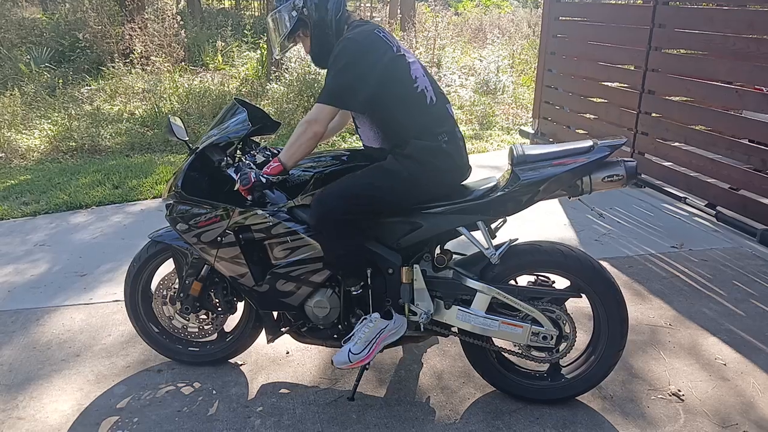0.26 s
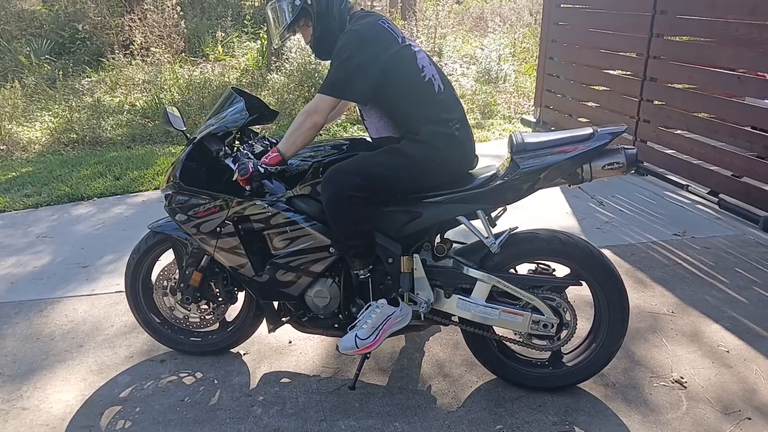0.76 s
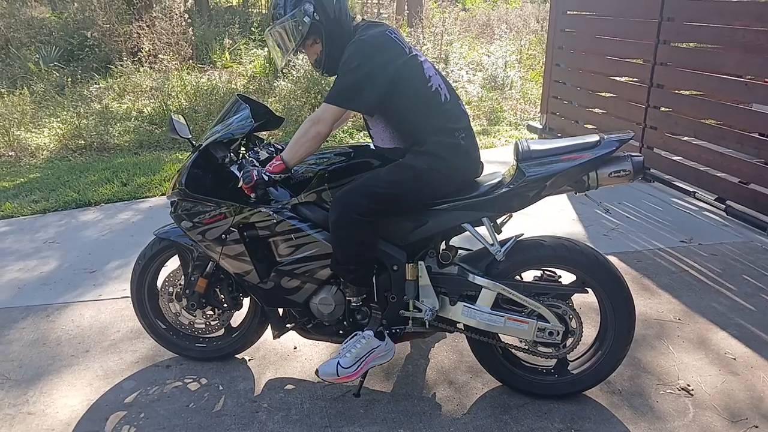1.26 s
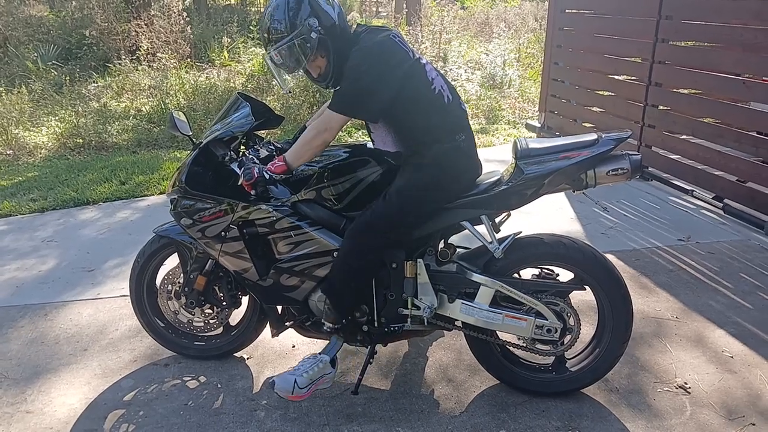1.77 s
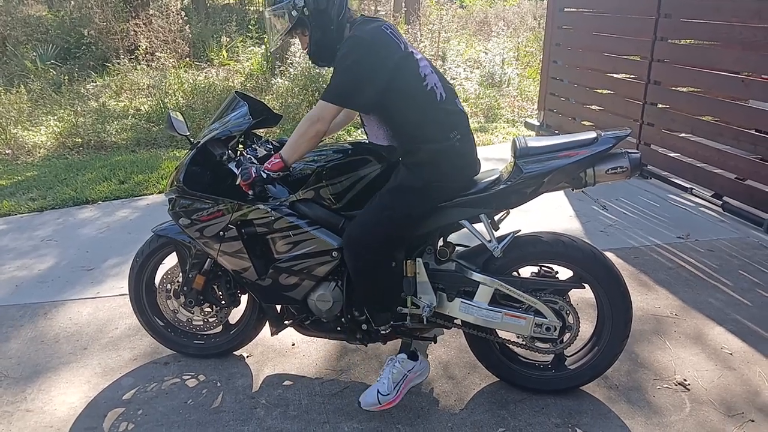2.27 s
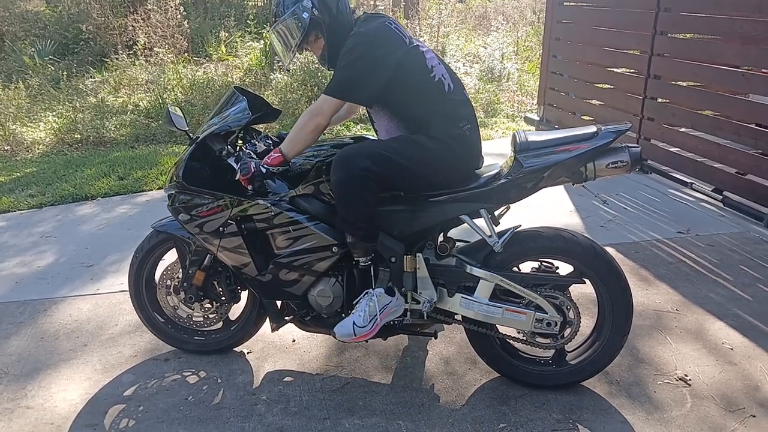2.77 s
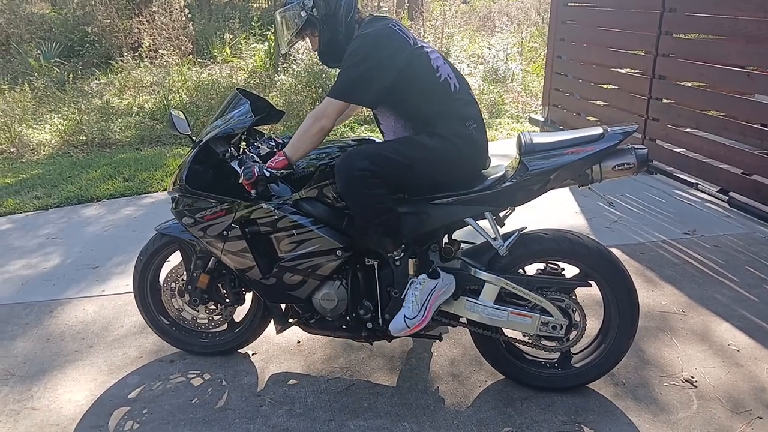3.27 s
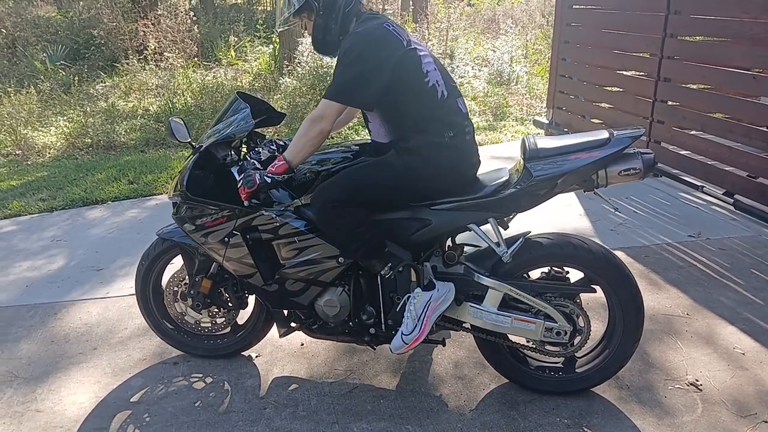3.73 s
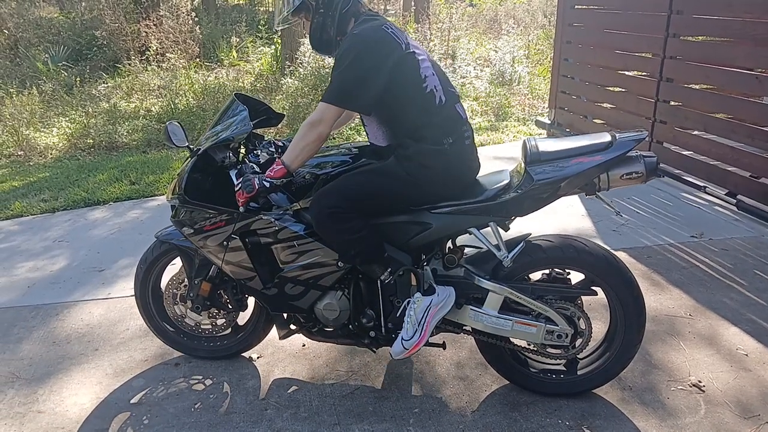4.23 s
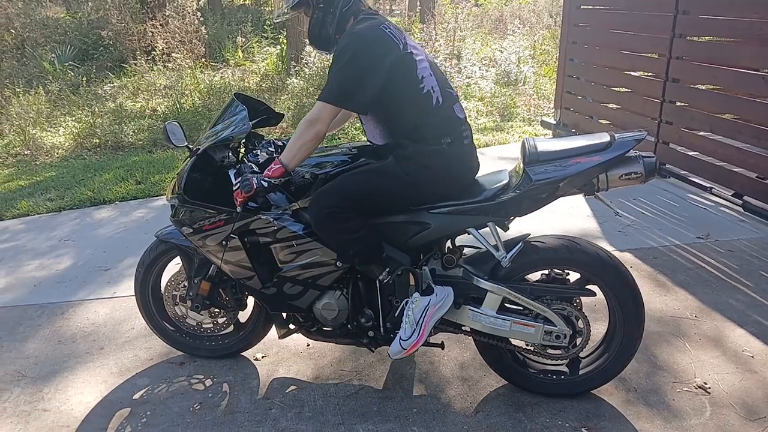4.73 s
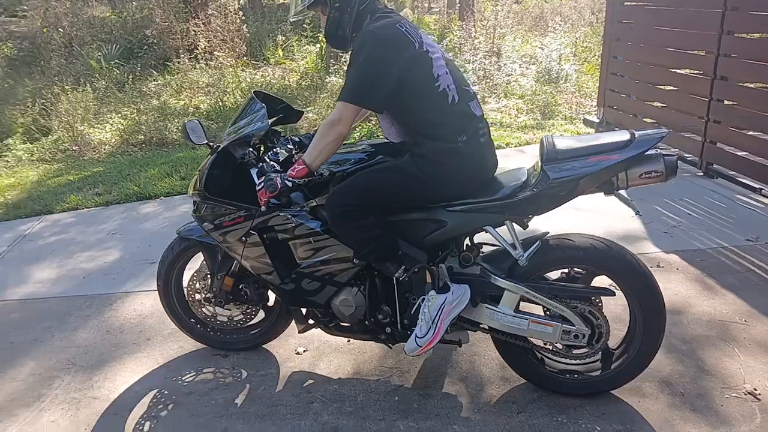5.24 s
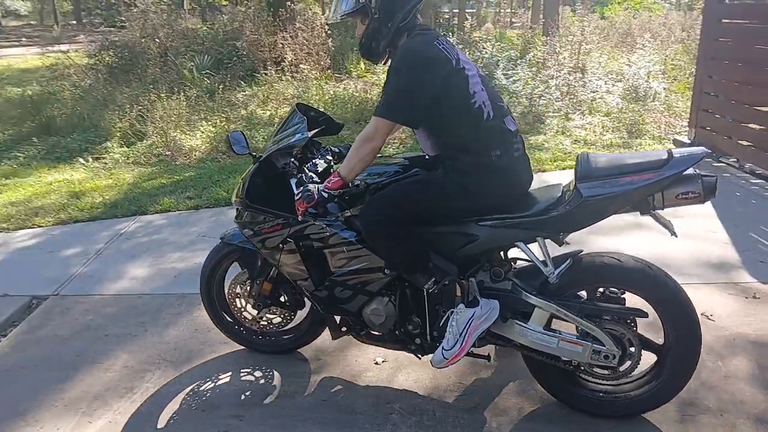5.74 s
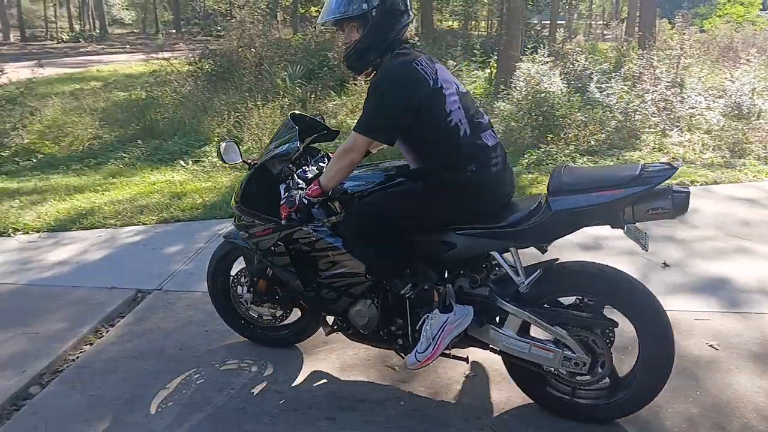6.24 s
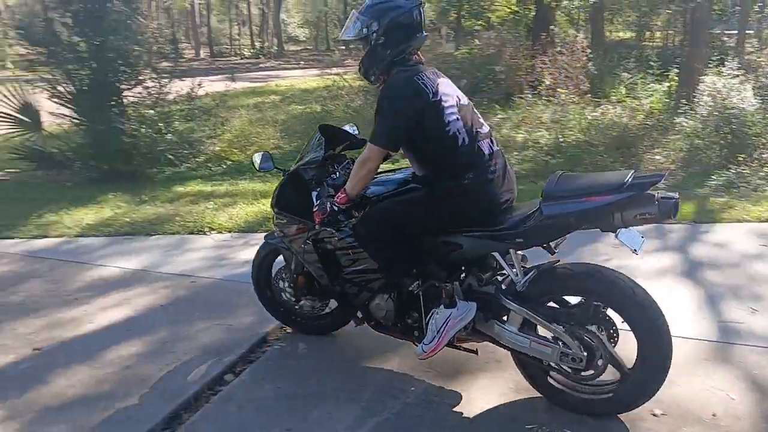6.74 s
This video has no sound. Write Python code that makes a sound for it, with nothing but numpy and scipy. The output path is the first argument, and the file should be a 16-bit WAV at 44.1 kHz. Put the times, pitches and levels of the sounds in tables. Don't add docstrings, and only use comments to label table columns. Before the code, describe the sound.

A four-cylinder motorcycle stalls with metal clacks and fading puffs, leaving faint traffic hum. The side stand snaps up with sharp clacks, a starter whines in four short surges, and the engine catches unevenly with rattle. It settles to a buzzing low idle, gets one quick blip with popping overrun, then revs moderately and pulls away. Phone a few metres off on an open concrete drive.

```python
import sys
import numpy as np
from scipy import signal
from scipy.fft import rfft, irfft, next_fast_len
from scipy.io import wavfile
from scipy.ndimage import map_coordinates

SR = 44100
rng = np.random.default_rng(int(sys.argv[2]) if len(sys.argv) > 2 else 0)


def pcm_store(signal):
    levels = np.round(np.clip(np.atleast_2d(signal), -1, 1) * 32767)
    wavfile.write(sys.argv[1], SR, levels.astype(np.int16).T)


def gain_from_db(level_db):
    decades = np.asarray(level_db, float) / 20
    return 10 ** decades


N = 308700
STAND_S, CRANK_S = 2.025, 2.19


def unit(x):
    return x / np.sqrt(np.mean(x ** 2) + 1e-20)


def along(points, hz):
    f, v = np.transpose(points)
    return np.interp(np.log(hz + 1), np.log(f + 1), v)


def curves(rows):
    s, *cols = np.transpose(rows)
    return [np.interp(np.arange(N) / SR, s, c) for c in cols]


def sounding(rows, fade):
    t = np.arange(N) / SR
    return np.clip(np.minimum(t - rows[0][0], rows[-1][0] - t) / fade + 1, 0, 1)


def wobble(rate):
    knots = rng.standard_normal(int(N * rate / SR) + 4)
    return map_coordinates(knots, [np.arange(N) * rate / SR])


def filtered(x, response):
    m = 2 * next_fast_len(N // 2 + SR // 4)
    return irfft(rfft(x, m) * response(np.fft.rfftfreq(m, 1 / SR)), m)[..., :N]


def causal(gain):
    c = irfft(np.log(gain + 1e-5))
    c[1:len(c) // 2] *= 2
    c[len(c) // 2 + 1:] = 0
    return np.exp(rfft(c))


def noise(spectrum, gate=1):
    return unit(filtered(gate * rng.standard_normal((2, N)), lambda hz: gain_from_db(along(spectrum, hz))))


def resonances(modes):
    return lambda f: sum(gain_from_db(db) * 1j * f * w / (c * c - f * f + 1j * f * w) for c, w, db in modes)


def driven(law, throttle_db):
    return law[0] + law[1] * throttle_db


# (time [s], firing rate [1/s])
FIRING_RATE = [(3.2, 45.2), (3.71, 45), (3.83, 51.2), (3.95, 48.7), (4.06, 52), (4.15, 80), (4.25, 109),
               (4.36, 99.7), (4.65, 64), (4.71, 49.5), (4.89, 44.5), (5.03, 45), (5.23, 59), (5.52, 59),
               (5.8, 56.8), (5.94, 54.3), (6.08, 57.1), (7.0, 57.2)]


def firings(throttle_db, since_clutch):
    rate = curves(FIRING_RATE)[0] * (1 + .008 * wobble(8))
    rate = rate * (1 + .02 * np.clip(-throttle_db / 3, 0, 1) * wobble(22))
    period_s, depth, dies_s = .25, .022, .7
    hunting = np.exp(-np.abs(since_clutch) / dies_s) * np.cos(2 * np.pi * since_clutch / period_s)
    rate = rate * (1 + depth * (since_clutch > -period_s / 4) * hunting)
    fires = np.arange(N) > FIRING_RATE[0][0] * SR
    return rate, np.flatnonzero(np.diff(np.floor(np.cumsum(rate * fires) / SR)))


# (time [s], extra bark [dB])
AFTERFIRES = [
    (2.79, 5),
    (3.84, 3),
    (4.32, 5),
    (4.4, 7),
    (4.5, 3),
    (4.62, 6.5),
    (4.75, 7),
    (4.83, 6),
    (4.94, 5),
]


def afterfire():
    half_length_s = .022
    t = np.arange(N) / SR
    return sum(np.exp(-((t - s) / half_length_s) ** 2) * db for s, db in AFTERFIRES)


# (time [s], throttle over idle [dB])
THROTTLE = [(2.57, -8.5), (2.731, 4), (2.85, 1), (3.2, -1), (3.8, -0.5), (3.89, -2), (4.049, -0.5),
            (4.13, 8), (4.2, 7.5), (4.279, -1.5), (4.45, -4), (4.6, -4.5), (4.7, -6.5), (4.9, -6),
            (5.1, -3), (5.32, -2), (5.6, 0.5), (7.0, 0.5)]
# (time [s], peak level [dB])
STALL_PUFFS = [(0.0, -8.5), (0.018, -10.5), (0.04, -13.5), (0.058, -8.5), (0.079, -8.5), (0.107, -13.5),
               (0.126, -16), (0.152, -15), (0.188, -18.5), (0.23, -20.5), (0.308, -36)]
# (time [s], peak level [dB])
CATCH_PUFFS = [(2.551, -10.5), (2.581, -5.5), (2.612, -14), (2.643, -20), (2.674, -12.5), (2.7, -8),
               (2.723, -8), (2.741, -9.5), (2.757, -5), (2.779, -8), (2.796, -15), (2.812, -7.5),
               (2.827, -12.5), (2.85, -17), (2.868, -8), (2.887, -17), (2.906, -7.5), (2.927, -10),
               (2.965, -10), (3.002, -20), (3.025, -9), (3.047, -16), (3.073, -7.5), (3.092, -8),
               (3.116, -27.5), (3.133, -7), (3.156, -24), (3.178, -12), (3.199, -8)]


def puff_trains():
    boom, second, bark = (34.8, .8), (37.5, 1), (35.14, 1.08)
    rasp, branch = (-4, 2.5), (-29, .9)
    uneven_db = 1.15
    throttle_db, = curves(THROTTLE)
    since_clutch = np.arange(N) / SR - 5.28
    rate, at = firings(throttle_db, since_clutch)
    rolling = since_clutch[at] > -.125
    luck = rng.standard_normal((len(at), 3))
    scatter_db = np.clip(uneven_db - .18 * throttle_db[at], .7, 2.3)
    scatter_db[rolling] = .6

    size_db = np.resize([-0.93, 0.29, -2.4, 0.58], len(at)) + scatter_db * luck[:, 0]
    size_db -= 10 * np.log10(rate[at] / 50)
    levels_db = np.array([driven(law, throttle_db[at]) for law in (boom, second, bark, rasp, branch)])
    levels_db[2:4] += [[1.3], [1.5]] * scatter_db * luck[:, 1:].T
    levels_db[3] += 12 * np.log2(rate[at] / 50) + 8.5 * rolling
    flare_db = afterfire()
    levels_db[3] += 1.3 * flare_db[at] * rate[at] / 50
    hush_db = 4 * np.clip(3 * (scatter_db - uneven_db), 0, 1)
    levels_db += [[0.28], [0.28], [1], [1], [1]] * (flare_db[at] - hush_db)

    puffs = np.zeros((5, N + SR))
    puffs[:3, round(STAND_S * SR)] = gain_from_db([16, 14, 26.5])
    jitter = (14 * scatter_db ** 2 * luck[:, 2]).astype(int) // 2
    puffs[:, at + jitter] = gain_from_db(size_db + levels_db)
    puffs[4] *= np.cos(np.pi * np.cumsum(puffs[4] > 0))

    for s, db in STALL_PUFFS + CATCH_PUFFS:
        i = max(round(s * SR), 0)
        bark_db = 32.5 + 0.8 * (db + 8.5)
        bark_db += (s > CRANK_S) * 0.93 * throttle_db[i] + flare_db[i]
        puffs[:3, i] = gain_from_db([db + 42.5, db + 47.0, bark_db])
    for s, length, *_ in CRANKS:
        puffs[:2, round((s + length / 2) * SR)] = gain_from_db(21)
    return puffs[:, :N]


# (frequency [Hz], gain [dB])
PIPE = [(15, -95.5), (46, -9.5), (90, 5), (115, 2), (137, 0.5), (170, -6.5), (197, -27.5), (228, -15.5),
        (275, -3), (312, -14.5), (345, -3), (375, -13), (410, -39.5), (600, -67.5)]
# (frequency [Hz], gain [dB])
THROAT = [(330, -48), (430, 2.5), (520, -1.5), (700, -3.5), (900, -14), (1200, -16), (2000, -46.5)]
# (frequency [Hz], width [Hz], level [dB])
HEADER = (261, 4.9, 31.87)


def exhaust():
    def paths(hz):
        under, low = (1 / (1 + (hz / edge) ** 12) for edge in (126, 200))
        far_end = 1 + 0.25 * np.exp(-2j * np.pi * hz * 0.00968)
        pipe = causal(gain_from_db(along(PIPE, hz))) * far_end
        throat = causal(gain_from_db(along(THROAT, hz)))
        branch = resonances([HEADER])(hz) ** 2
        return np.array([pipe * under, pipe * (low - under), pipe * (1 - low), throat, branch])
    return -filtered(puff_trains(), paths).sum(0)


# (frequency [Hz], density [dB per Hz])
INTAKE = [(240, -1), (410, -9), (602, -4), (740, -10), (834, -7.5), (940, -11.5), (1100, -9.5), (1430, -30),
          (2420, -120)]
# (frequency [Hz], density [dB per Hz])
CASING = [(530, -37.5), (900, -10.5), (1220, -7), (1360, -8), (1480, -3), (1800, -2), (3270, -16.5),
          (4380, -11.5), (5520, -15), (6700, -16), (8980, -16.5), (10600, -17.5), (13700, -15),
          (15900, -16.5), (16500, -45.5)]
# (frequency [Hz], width [Hz], level [dB])
COVERS = [(1215, 41, 3), (1470, 58, -14.5), (1914, 180, -2.5), (2333, 19, 2)]
# (frequency [Hz], density [dB per Hz])
TAPPETS = [(3000, -61), (7500, -23.5), (9000, 0), (11000, -10.5), (13500, 0), (16000, -7)]


def parts():
    t, lit = np.arange(N) / SR, THROTTLE[0][0]
    rate, throttle_db = curves(FIRING_RATE)[0], curves(THROTTLE)[0]
    turn = 2 * np.pi * np.cumsum(rate) / SR
    roar = noise(INTAKE, gain_from_db(1.5 * np.cos(turn) + 0.74 * wobble(30)))
    clatter = noise(CASING, gain_from_db(0.76 * np.cos(turn) + 0.81 * wobble(60)))
    clatter = clatter + .9 * filtered(clatter, resonances(COVERS))
    tick_gate = np.exp(2.3 * np.cos(turn) + .8 * np.cos(turn / 2)) * gain_from_db(3.5 * wobble(40))
    gear = clatter + gain_from_db(-11.5) * noise(TAPPETS, tick_gate)

    coast = gain_from_db(-25 - 102.5 * t)
    coast = coast + (t > STAND_S) * gain_from_db(-38.5 - 88.5 * np.abs(t - STAND_S))
    running = sounding(THROTTLE, 0.044)
    cranked = sounding([(CRANK_S,), (lit - .03,)], 0.035) * gain_from_db(-31)
    settle_db = 11 * np.exp(-np.abs(t - lit) / 1)
    rattle_db = driven((-37.5, 0.38), throttle_db) + 5 * np.log2(rate / 50) + settle_db
    breath = coast + gain_from_db(-15.5) * cranked + running * gain_from_db(driven((-35, 0.86), throttle_db))
    return breath * roar + (coast + cranked + running * gain_from_db(rattle_db)) * gear


# (start [s], length [s], level [dB], tooth rate [Hz], its first change [Hz/s])
CRANKS = [
    (2.199, .102, -21, 618.3, 6301.5),
    (2.31, .074, -17, 1266, -150),
    (2.41, .047, -15.5, 1399, -2300),
    (2.48, .052, -15.5, 1449, -2400),
]
# (frequency [Hz], width [Hz], level [dB])
HOUSING = [(1305, 41, 10), (1606, 230, 5.5), (2324, 680, 2.5), (3700, 610, -6), (5060, 520, -1.5),
           (9400, 3000, 0)]
# (frequency [Hz], density [dB per Hz])
CRACK = [(180, -8), (300, -27), (820, -9.5), (1400, -3), (2100, 1), (2610, -10.5), (5020, -5), (7380, -6),
         (14200, -4.5), (16500, -30.5)]


def starter():
    swell_db, full_at, let_go_at = 6.5, 0.49, .8
    bite_s, throb_s = 0.0058, .018
    t = np.arange(N) / SR
    teeth_hz, load, bite = np.full(N, 600.), np.zeros(N), np.zeros(N)
    for s, length, db, hz, change in CRANKS:
        u = (t - s) / length
        since = np.clip(t - s, 0, 1.15 * length)
        slowed_hz = hz + change * since - 45000 * since ** 2
        teeth_hz = np.where(u > -.2, slowed_hz, teeth_hz)
        shape_db = np.interp(u, [-.1, .1, full_at, let_go_at, let_go_at + .09, 1.25],
                             [-40, -swell_db, 0, -1.5, -13, -30], left=-120, right=-120)
        throb_db = 0.5 * np.cos(2 * np.pi * (t - s) / throb_s)
        load = load + gain_from_db(db + shape_db - throb_db)
        bite = bite + gain_from_db(db - 2.5) * (u > 0) * np.exp(-((t - s - bite_s) / bite_s) ** 2)
    mesh = 2 * np.pi * np.cumsum(teeth_hz * (1 + .04 * wobble(300))) / SR
    knocks = np.exp(16 * np.cos(mesh)) * gain_from_db(2 * np.cos(mesh / 2) + 3.2 * wobble(160))
    rough = .42 * rng.standard_normal((2, N)) * gain_from_db(3 * wobble(200))
    whine = unit(filtered(unit(knocks) * [[1], [.1]] + rough, resonances(HOUSING)))
    rasp = noise(CRACK, gain_from_db(2.5 * wobble(120) + 4 * np.cos(mesh)))
    return (load + 0.3 * bite) * whine + (gain_from_db(-13.5) * load + gain_from_db(-6.5) * bite) * rasp


# (time [s], peak level [dB], decay T60 [s], thud [dB], brightness [dB])
CLACKS = [(.009, -9, 0.058, -2.5, -8.5), (0.078, -12, 0.051, -1, -19.5), (0.1853, -16.5, 0.066, 5.5, -14.5),
          (.272, -28, 0.048, -24, -15.5), (.280, -21, 0.049, -31, -26), (.3165, -19.5, 0.038, -35, -7),
          (0.3273, -13, .036, -17.5, -7.5), (.435, -45, 0.054, 9, -7), (.496, -43.5, 0.032, -27, 14),
          (0.647, -61, 0.027, -20.5, 1), (.82, -64, .03, -20.5, 3), (1.637, -48.5, 0.028, -12, 3),
          (1.9577, -32.5, 0.14, 9.5, -17), (2.021, -5.5, 0.047, -21, -9.5),
          (2.086, -16.5, 0.067, -4.5, -14.5), (2.148, -2, .046, -14.5, -20), (2.167, -15, 0.046, 11, -18)]
# (frequency [Hz], level [dB], decay T60 [s])
FRAME = [(663, -15.5, 5.0), (1225, -10.5, 0.087), (1319, 6.5, 0.029), (1670, -20.5, 0.04),
         (2670, -20, 0.11), (4000, -30.5, 0.23), (5100, -28, 0.3), (6062, -29.5, 0.17), (6600, -30, 0.12),
         (8650, -22, 0.26)]


def clacks():
    out, t = np.zeros((2, N + SR)), np.arange(12000) / SR
    hz = np.fft.rfftfreq(len(t), 1 / SR)
    rise_s = 1.1e-3
    for s, db, t60, thud_db, bright_db in CLACKS:
        ring = sum(gain_from_db(level + rng.normal(0, 5.4) - 60 * t / life) * np.sin(2 * np.pi * f * t)
                   for f, level, life in FRAME)
        tilt = [(200, thud_db - 2), (500, thud_db + 19), (1500, 0.013), (4000, 0.0049), (13000, bright_db + 5)]
        colour_db = along(CRACK, hz) + along(tilt, hz)
        burst = unit(irfft(rfft(rng.standard_normal((2, len(t)))) * gain_from_db(colour_db)))
        fall = gain_from_db(-60 * t / np.clip(t60, .01, .15)) * (1 - np.exp(-t / rise_s))
        hit = burst * fall + [[.4], [.1]] * ring * fall ** .5
        out[:, round(s * SR):][:, :len(t)] += gain_from_db(db - 3.03) * hit
    return out[:, :N]


# (frequency [Hz], decay T60 [s])
YARD = [(150, 0.36), (1500, 0.24), (10000, 0.17)]


def yard(x):
    hz, t, z = signal.stft(rng.standard_normal((2, SR // 2)), SR, nperseg=256)
    tail = signal.istft(z * gain_from_db(-60 * t / along(YARD, hz)[:, None]), SR, nperseg=256)[1]
    tail = tail / np.linalg.norm(tail[0])
    return signal.fftconvolve(np.pad(x, (500, 0))[None], tail, axes=1)[:, :N]


# (time [s], hum level [dB])
TRAFFIC = [
    (0.35, -43),
    (0.64, -52.5),
    (1.2, -56.5),
    (1.45, -50.5),
    (1.52, -57.5),
    (1.8, -43.5),
    (1.95, -42.5),
]
# (frequency [Hz], density [dB per Hz])
HUM = [(12, -80), (20, -48.5), (59, -8.5), (76, -3.5), (118, -12), (145, -16.5), (193, -29), (300, -37.5),
       (390, -68), (660, -120)]
# (frequency [Hz], density [dB per Hz])
HISS = [(120, -27), (200, 0.5), (379, -11), (431, -8.5), (455, -9), (772, -5.5), (910, -14), (1310, -13),
        (5860, -30), (6780, -21), (8750, -31.5), (15700, -22)]
# (frequency [Hz], level [dB])
INSECT = [(6912, -97)]


def street():
    hum_db, = curves(TRAFFIC)
    (hz, db), = INSECT
    whine = gain_from_db(db + 17.5 + 1.5 * wobble(15)) * np.sin(2 * np.pi * hz * np.arange(N) / SR)
    lumps = gain_from_db(1.5 * wobble(12) + 1.5 * wobble(5))
    hum = lumps * gain_from_db(hum_db) * noise(HUM)
    hiss = gain_from_db(-64 + .55 * (hum_db + 52) + .8 * wobble(2.6)) * noise(HISS)
    return whine + hum + hiss


# (frequency [Hz], coherence [0-1])
ALIKE_NEAR = [(100, .995), (340, .95), (520, .88), (700, .77), (1050, .58), (2050, .58), (2600, .25),
              (4800, .3), (8000, .15)]
# (frequency [Hz], coherence [0-1])
ALIKE_FAR = [(100, .98), (340, .89), (520, .54), (700, .4), (1000, .1), (8000, .05)]
# (frequency [Hz], left over right [dB])
LEAN = [(30, -1.4), (170, -1), (500, -.3), (1030, -2), (1400, -3.5), (1750, 0), (2100, 2), (2850, 6.5),
        (3600, 0), (4800, -10), (5500, -12), (6400, -5), (8300, 5), (9500, .5)]
# (frequency [Hz], lead of the left [rad])
LEAD = [(60, 0), (170, -.2), (340, -.45), (520, -.65), (1030, -.7), (1400, -.4), (2000, -.2), (5000, .2)]


def ports(pair, alike):
    def blend(hz):
        angle = np.arccos(along(alike, hz)) / 2
        return np.array([np.cos(angle), np.sin(angle)])

    def tilts(hz):
        tilt = gain_from_db(along(LEAN, hz) / 2) * np.exp(.5j * along(LEAD, hz))
        return np.array([tilt, 1 / tilt])
    mid, side = filtered(pair, blend)
    return filtered(np.array([mid + side, mid - side]), tilts)


def scene():
    metal = starter() + clacks()
    echo = gain_from_db(-15) * yard(metal[0])
    near = exhaust() * [[1], [0]] + metal + parts() + echo
    return ports(near, ALIKE_NEAR) + ports(street(), ALIKE_FAR)


def low_pass(x):
    return signal.sosfilt(signal.butter(12, 16790, fs=SR, output="sos"), x)


def record(dry):
    soft = dry / (1 + np.abs(dry / .97) ** 6) ** (1 / 6)

    def response(hz):
        dip_db = -5 * np.exp(-((hz - 6700) / 700) ** 2)
        return gain_from_db(dip_db - 38 * (hz > 15820))
    return low_pass(filtered(soft, response))


dry = scene()
out = record(dry)
pcm_store(out)
```